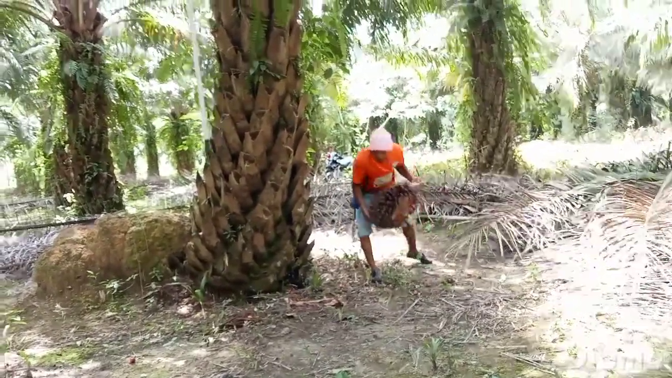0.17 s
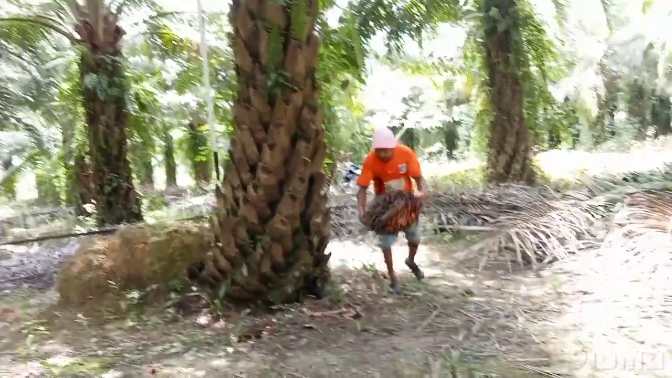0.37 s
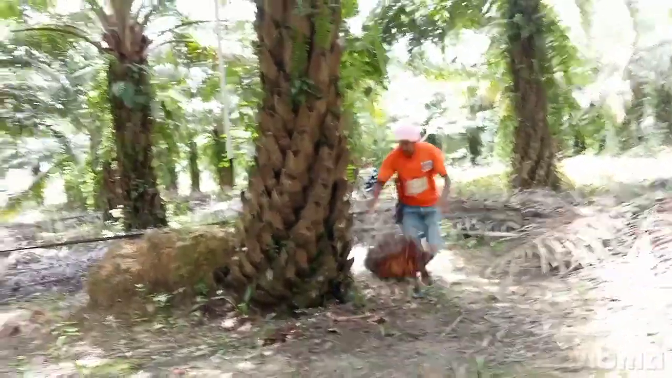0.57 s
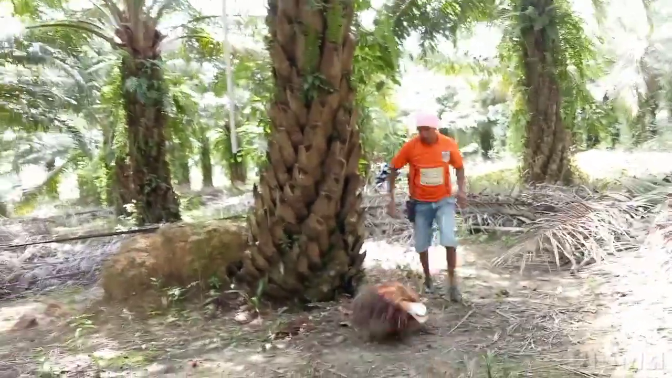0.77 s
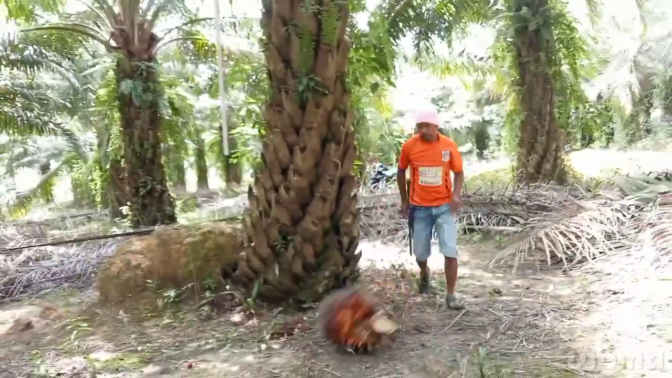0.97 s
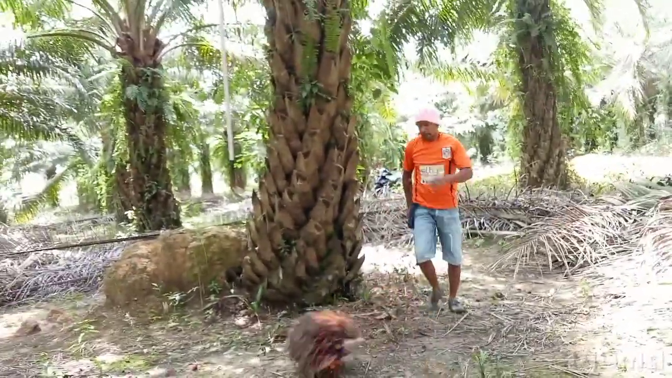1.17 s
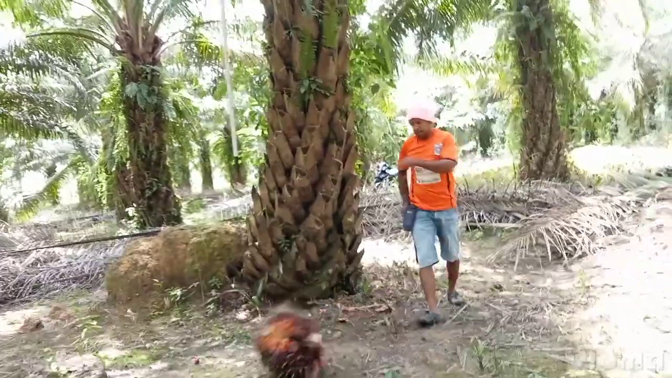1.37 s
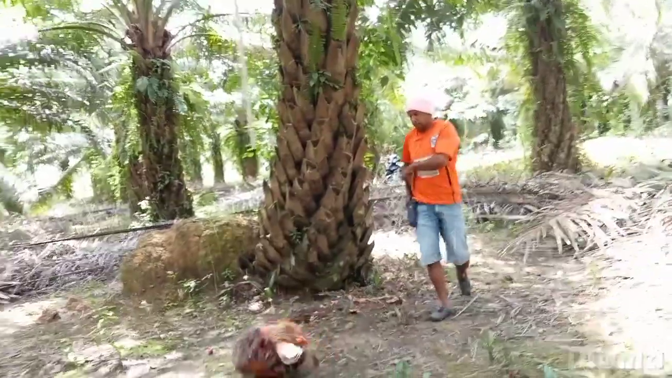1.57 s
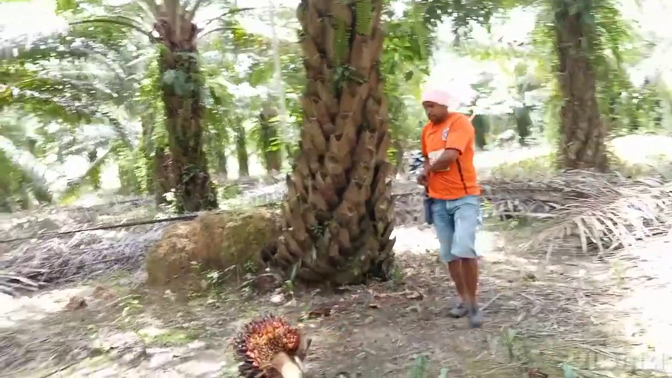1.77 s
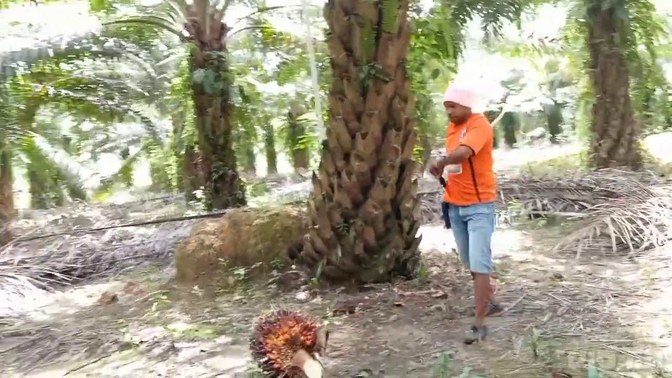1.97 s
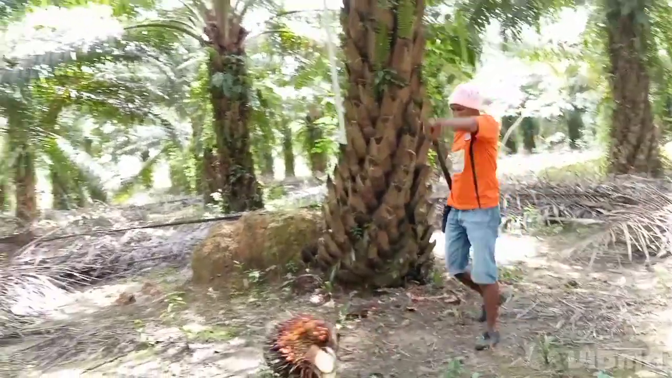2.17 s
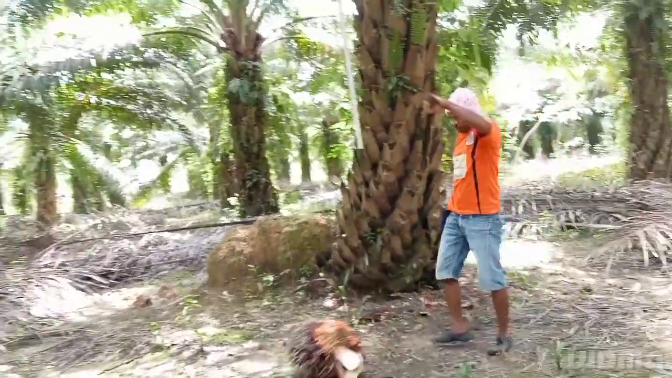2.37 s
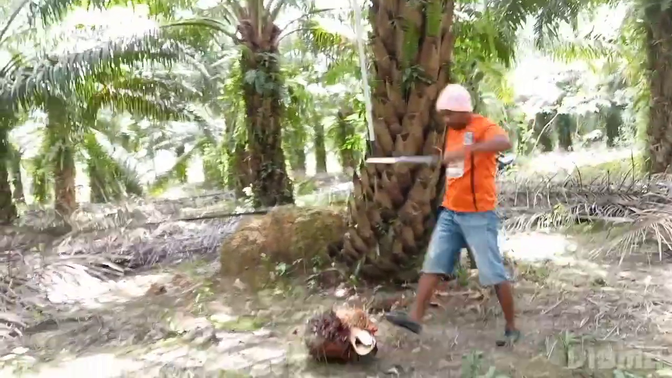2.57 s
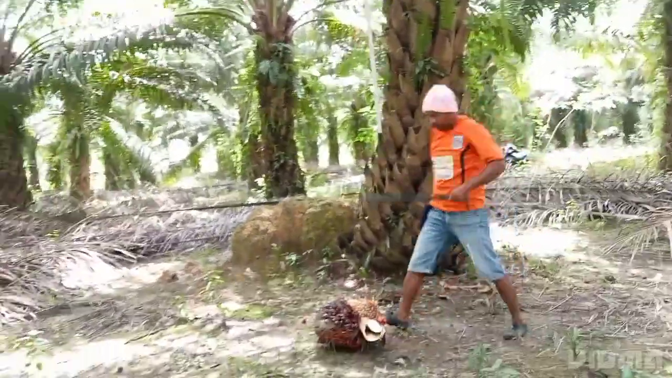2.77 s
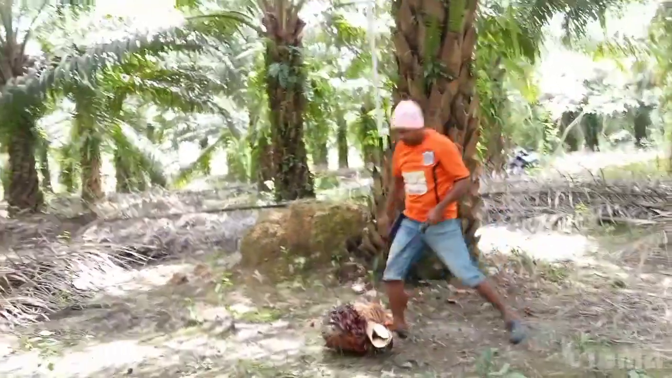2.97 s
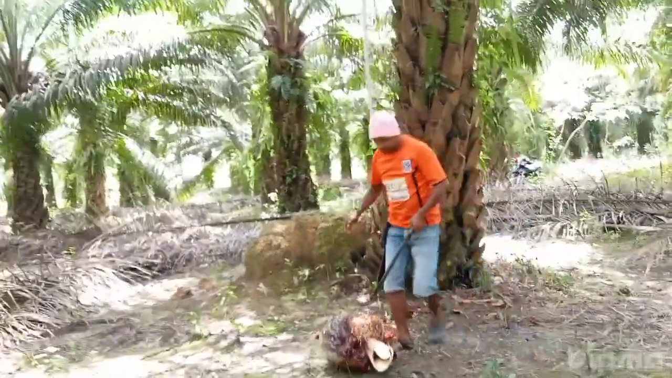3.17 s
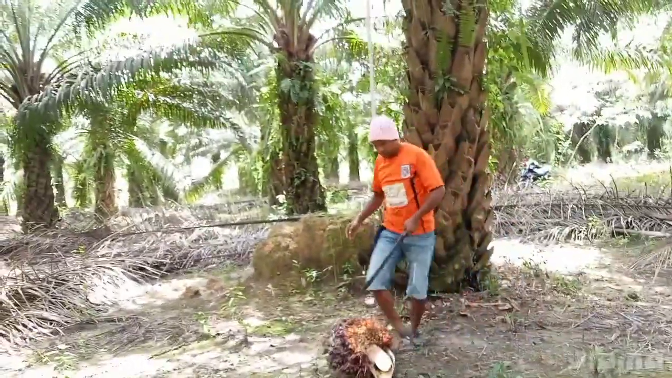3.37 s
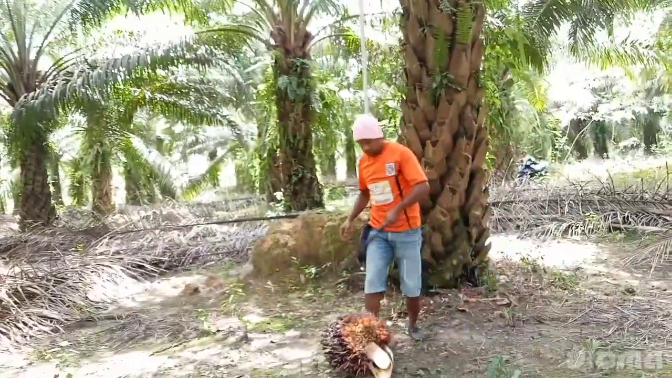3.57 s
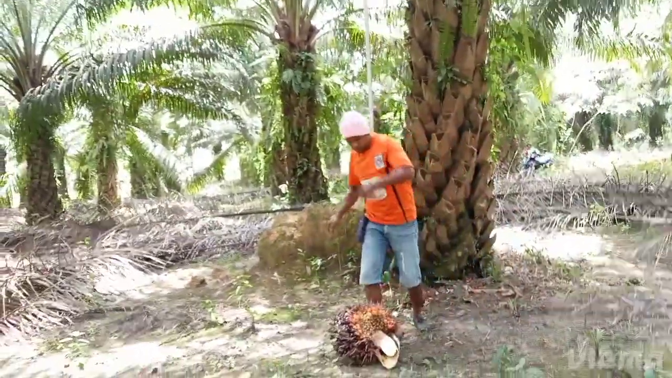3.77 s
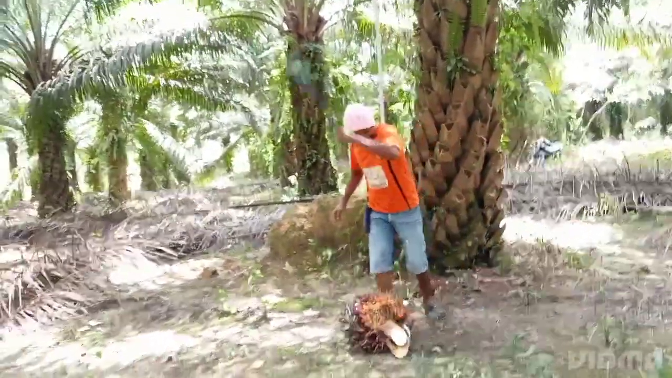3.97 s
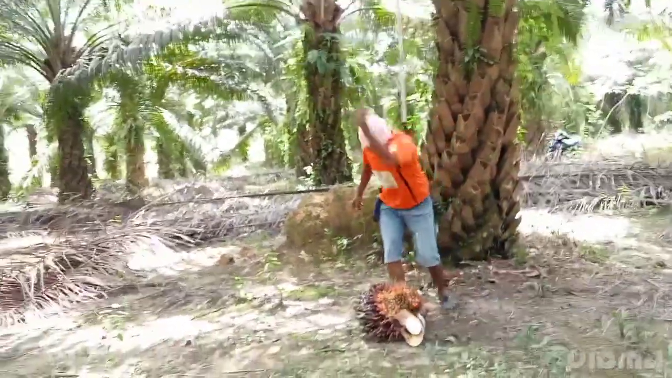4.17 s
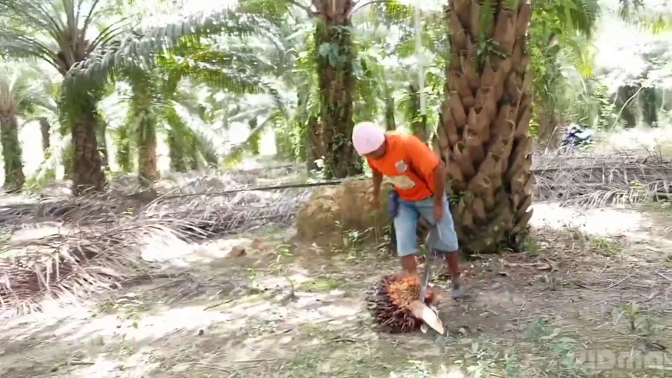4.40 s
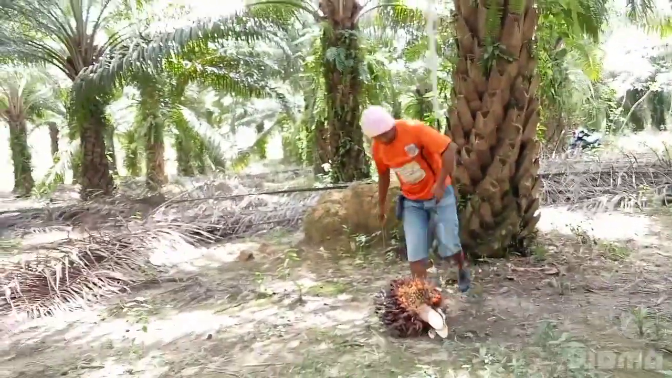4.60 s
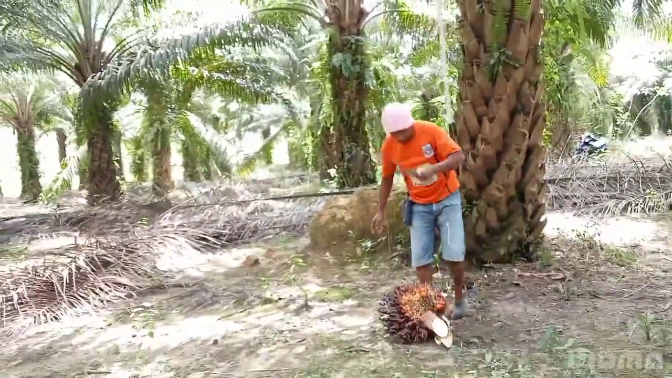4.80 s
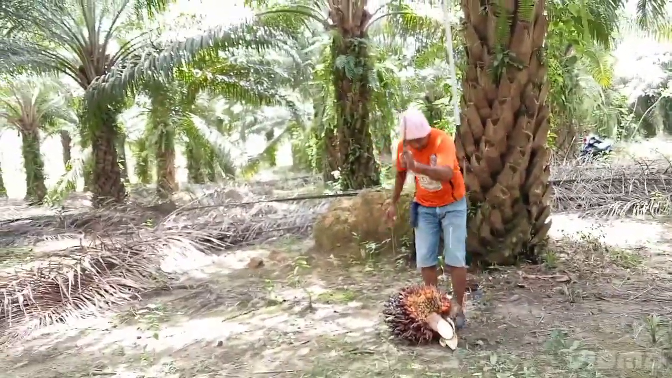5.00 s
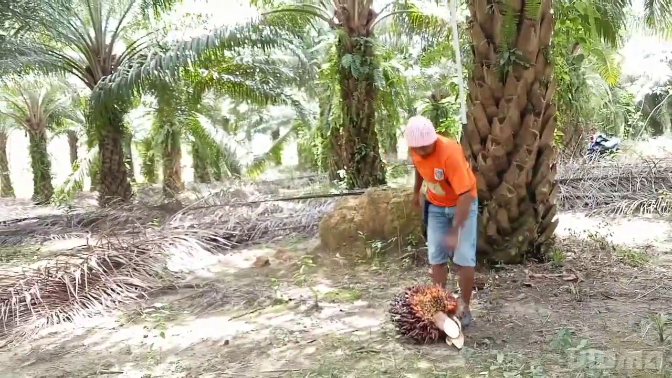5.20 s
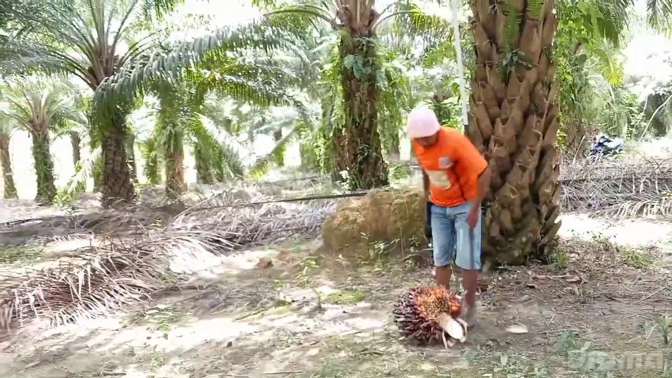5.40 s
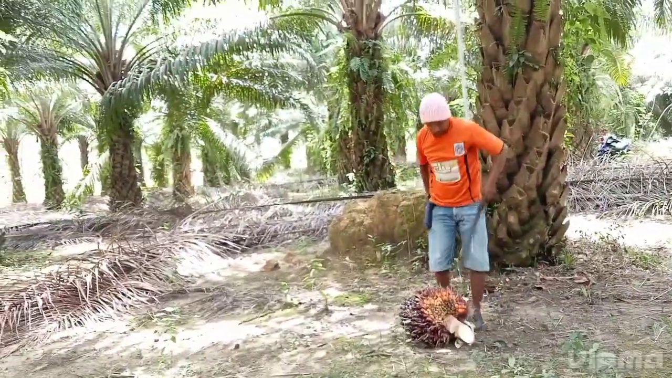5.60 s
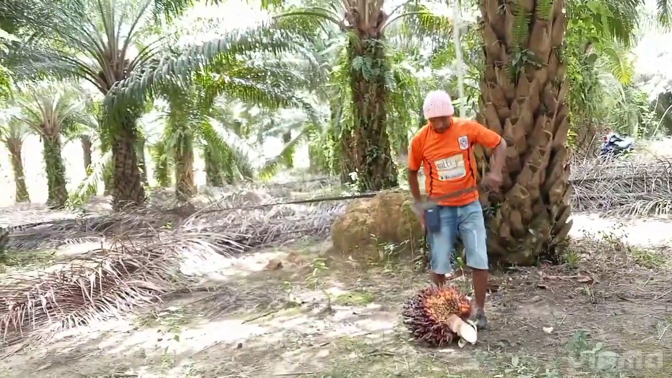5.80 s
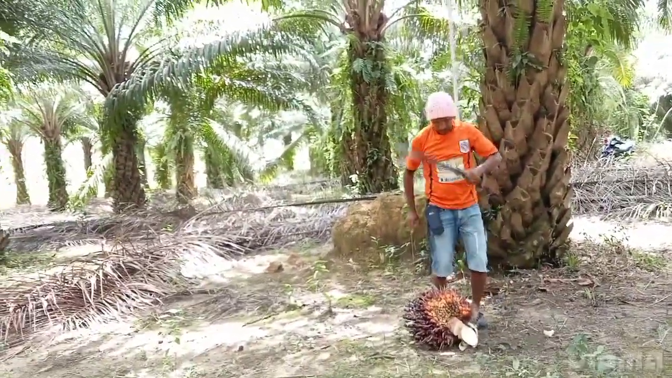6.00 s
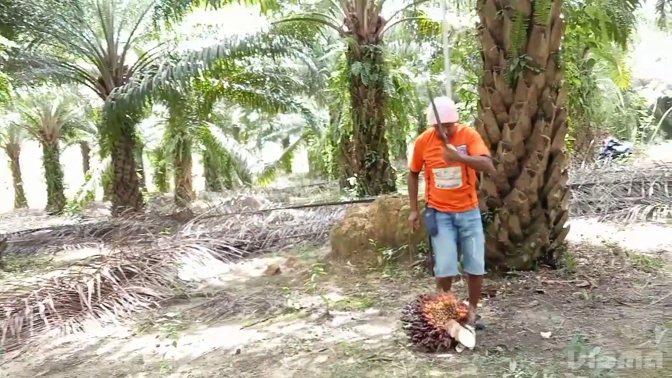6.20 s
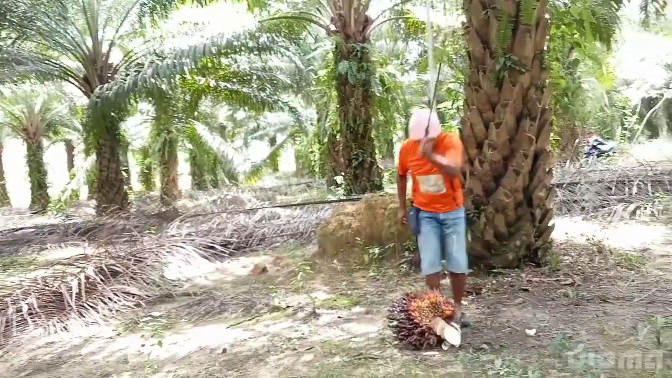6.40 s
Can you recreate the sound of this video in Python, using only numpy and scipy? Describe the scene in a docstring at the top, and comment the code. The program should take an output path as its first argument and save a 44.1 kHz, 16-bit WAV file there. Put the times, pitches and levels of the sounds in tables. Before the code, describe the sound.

Outdoors under a steady high insect buzz: a weighty thud on dry litter, shuffling steps, sharp clicks, then two hard blade chops ringing away.

```python
"""Cicadas drone all round, as a dense noise band with two throbbing voices, and an engine putters far off.
This is an oil palm plantation: a harvester shuffles through dry litter (clumped grains) and his tool clicks
(noise bursts). A dropped bunch thuds and rolls (crushed grains, ground modes); birds whistle (narrow noise).
Two chops into a stalk tear fibres and ring modes; the trunks scatter the work back as a bright tail, and
after the second chop the blade's ring echoes as a faint narrow tone."""
import sys
import numpy as np
from scipy import signal
from scipy.fft import rfft, irfft
from scipy.io import wavfile

SR = 44100
rng = np.random.default_rng(int(sys.argv[2]) if len(sys.argv) > 2 else 0)


def store_wav(level_fs):
    """Save 16-bit WAV to argv[1]."""
    pcm = np.round(np.clip(np.atleast_2d(level_fs), -1, 1) * 32767)
    wavfile.write(sys.argv[1], SR, pcm.T.astype(np.int16))


N = 284427
TIME = np.arange(N) / SR  # s
CUTOFF_HZ = 15550

# Spectrum of the scatter from the trunks. Each row: frequency in Hz, level in dB against the direct sound.
TRUNK_SCATTER = [(100, -11), (300, -15.5), (600, -20.5), (1200, -5), (2100, 1.5), (3000, 1), (3700, -14.5),
                 (5200, -2.5), (8000, -6), (15000, -14)]


def from_db(db):
    """Amplitude ratio: 20 dB is a factor of ten in gain."""
    return 10 ** (np.asarray(db) / 20)


def rms_one(x):
    """Normalization by mean square: the result has rms 1."""
    return x / np.sqrt(np.mean(x ** 2) + 1e-20)


def in_time(rows):
    """Linear interpolation in time: each column of a curve at every sample."""
    s, *columns = np.transpose(rows)
    return [np.interp(TIME, s, column) for column in columns]


def at_hz(points, hz):
    """Interpolation on a logarithmic frequency axis."""
    known_hz, values = np.transpose(points)
    return np.interp(np.log(hz + 1), np.log(known_hz), values)


def colour(x, spectrum, size=8192):
    """Minimum-phase filtering by a folded cepstrum: causal, and white noise keeps its power."""
    gain = rms_one(from_db(at_hz(spectrum, np.fft.rfftfreq(size, 1 / SR))))
    cepstrum = irfft(np.log(gain))
    fold = np.r_[1, np.full(size // 2 - 1, 2), 1, np.zeros(size // 2 - 1)]
    impulse_response = irfft(np.exp(rfft(cepstrum * fold)))
    return signal.oaconvolve(x, impulse_response)[:len(x)]


def drift(knots_per_s):
    """Slow random modulation: Gaussian knots joined by straight lines, with a spread near 1."""
    knots = rng.standard_normal(N // 50)
    return np.interp(TIME * knots_per_s, np.arange(len(knots)), knots)


def resonate(x, hz, width_hz):
    """Two-pole resonance: damping sets the bandwidth, and the gain at the peak is 1."""
    r = np.exp(-np.pi * width_hz / SR)
    numerator = np.array([1, 0, -1]) * (1 - r * r) / 2
    denominator = [1, -2 * r * np.cos(2 * np.pi * hz / SR), r * r]
    return signal.lfilter(numerator, denominator, x + 1e-18)


def ring(modes, rise_s):
    """Modal superposition: damped sines, set going by a contact that builds over rise_s."""
    t = TIME[:SR // 2]
    vibration = sum(from_db(db - 60 * t / t60) * np.sin(2 * np.pi * hz * t) for hz, db, t60 in modes)
    return vibration * (1 - np.exp(-t / rise_s))


def grains(per_s, spread_db):
    """Shot noise: randomly timed clicks of uneven size and either sign, with rms 1."""
    sizes = from_db(spread_db * np.minimum(rng.exponential(1, N), 4)) * rng.choice([-1, 1], N)
    return rms_one(sizes * (rng.random(N) < per_s / SR))


def pulses(per_s, start):
    """Cyclic excitation: one click each time the accumulated phase completes a turn."""
    turns = start + np.cumsum(per_s) / SR
    return np.diff(np.floor(turns), prepend=np.floor(start))


def crack(envelope):
    """Broadband transient: a noise burst whitened by setting its spectral magnitudes equal."""
    burst = envelope * rng.standard_normal(len(envelope))
    # the envelope disturbs the flat spectrum, so the two are imposed in turn
    for _ in range(4):
        flat = irfft(np.exp(1j * np.angle(rfft(burst))), len(envelope))
        burst = envelope * flat
    return rms_one(burst) * np.sqrt(np.mean(envelope ** 2))


def add(track, s, sound):
    """Linear superposition of a sound on a track at time s."""
    at = round(s * SR)
    track[at:at + len(sound)] += sound[:N - at]


def cicadas(far_db=0.73, throb=0.98, smear_s=0.0022, width_hz=120, flutter_db=0.93):
    """Incoherent sum: countless far insects blur into a band; near tymbals excite throbbing resonances."""
    # Level of the whole chorus. Each row: time in seconds, level in dB.
    chorus_level = [(0, -47.5), (.7, -47.5), (1.6, -49.5), (2.3, -47.5), (3.2, -47), (4.3, -46.5),
                    (5.1, -46), (5.8, -46), (6.45, -45.5)]
    # Spectrum of the far insects. Each row: frequency in Hz, relative density in dB per Hz.
    chorus_band = [(5600, -41.5), (6050, -26), (6350, -14.5), (6800, -5.5), (7050, 3), (7450, 4),
                   (7900, -0.5), (8200, -18.5), (9300, -44), (11700, -51), (13000, -26.5), (13800, -26),
                   (14900, -11), (15600, -25)]
    # Nearer insects. Each row: pitch in Hz, mean tymbal clicks per second, mean throbs per second,
    # mean level in dB against the chorus.
    near_insects = [(7114, 61, 29, -10), (7196, 160, 17, -7.5)]
    far = colour(rng.standard_normal(N), chorus_band)
    out = from_db(far_db + flutter_db * drift(25)) * far
    for hz, clicks_per_s, throbs_per_s, db in near_insects:
        pace = 1 + .025 * drift(1.6)
        buzz = signal.lfilter([1], [1, -np.exp(-1 / (smear_s * SR))], pulses(clicks_per_s * pace, 0))
        swell = 1 + throb * np.sin(2 * np.pi * np.cumsum(throbs_per_s * pace) / SR)
        excitation = buzz * swell * rng.standard_normal(N)
        song = resonate(resonate(excitation, hz, width_hz), hz, width_hz=440)
        out += from_db(db + 0.68 * drift(4.1)) * rms_one(song)
    return from_db(in_time(chorus_level)[0]) * out


def engine(start=0.1998, smear_s_per_hz=.00009, boom_hz=96, boom_octaves=0.27):
    """Harmonic series of the firing rate, smeared by distance; as it labours, low orders swell to a boom."""
    # Running of the engine. Each row: time in seconds, firings per second, putter level in dB, boom level in dB.
    running = [(0, 15.8, -56.5, -87), (5.55, 15.45, -59.5, -78), (5.66, 13.2, -53, -68),
               (5.82, 11.8, -55, -57), (6.0, 13, -65, -56.5), (6.2, 15.5, -68, -58.5),
               (6.45, 11.8, -62, -53)]
    # Exhaust note. Each row: order as a multiple of the firing rate, relative level in dB.
    exhaust = [(1, -35), (2, -28), (3, -24), (4, -25), (5, 3.5), (6, -1.5), (7, -0.5), (8, -29), (9, -35),
               (10, -7), (11, 2), (12, -3), (13, -21), (14, -11.5), (15, -10.5), (16, -23.5), (17, -20.5),
               (18, -8.5), (19, -9), (20, -12), (21, -37), (22, -14.5), (23, -20.5), (24, -30)]
    per_s, putter_db, boom_db = in_time(running)
    waver, scatter_rad = .12, .45
    angle = 2 * np.pi * (start + np.cumsum(per_s) / SR)
    putter, boom = 0, 0
    for order, order_db in exhaust:
        hz = order * per_s
        # higher orders arrive a little later, each by its own path
        phase = order * angle - np.pi * smear_s_per_hz * hz ** 2 + rng.normal(0, scatter_rad)
        strength = from_db(order_db) * (1 + waver * drift(16))
        putter = putter + strength * np.cos(phase + waver * drift(3.3))
        # only the orders near the boom pitch swell
        weight = 1 / (1 + (np.log2(hz / boom_hz) / boom_octaves) ** 4)
        boom = boom + weight * from_db(2 * drift(2.46)) * np.cos(phase + rng.uniform(0, 2 * np.pi))
    return from_db(putter_db) * rms_one(putter) + from_db(boom_db) * rms_one(boom)


def hum_and_hiss(level_db=-58):
    """Stationary noise: far hum and leaf hiss share one shaped spectrum."""
    # Each row: frequency in Hz, relative density in dB per Hz.
    air_spectrum = [(20, -23), (45, 1), (75, 7.5), (150, 10.5), (300, -4), (500, -5.5), (1100, -10),
                    (2200, -8), (3300, -4), (4100, -17), (5200, -35), (8500, -12.5), (12000, -31)]
    return from_db(level_db) * colour(rng.standard_normal(N), air_spectrum)


def litter(scrape_db=-1, crackle_db=-2, clump_db=3.5, clumps_per_s=110):
    """Granular friction: soil scrapes in clumps of grains under each scuff; dry leaves crackle more sparsely."""
    # Scuffs of feet and of the rolling bunch. Each row: time of hardest push in seconds, build time in seconds,
    # fade time in seconds, soil scrape in dB and leaf crackle in dB before the overall trims.
    scuffs = [(0.04, 0.38, 0.17, -55.5, -52.5), (0.225, .02, 0.17, -67, -56.5),
              (0.583, 0.0083, 0.03, -63, -43), (0.65, 0.087, 0.028, -51.5, -58),
              (0.874, 0.025, 0.065, -36, -41.5), (1.038, 0.088, 0.075, -52, -48.5),
              (1.245, 0.072, 0.12, -51.5, -56), (1.53, 0.29, 0.15, -50.5, -52),
              (1.88, 0.33, 0.12, -56, -55.5), (2.029, 0.065, 0.11, -49.5, -76),
              (2.23, 0.11, 0.099, -61, -58), (2.39, 0.26, 0.12, -42, -55), (3.06, 0.12, 0.13, -58, -65),
              (3.40, 0.13, 0.66, -56.5, -58)]
    # Spectra of soil and of dry leaves. Each row: frequency in Hz, relative density in dB per Hz.
    soil_spectrum = [(200, -14), (420, -16), (650, 4), (1000, -1), (1400, 3), (2400, 3), (3400, 9.5),
                     (4200, -10.5), (5200, -36), (7000, -17)]
    leaf_spectrum = [(2000, -15), (3500, 25), (5200, 0), (7500, 28.5), (9500, 14.5), (12000, 10),
                     (14500, -37)]
    range_db = 20  # rise in one build time, fall in one fade time
    scrape, crackle = 0, 0
    for s, build_s, fade_s, soil_db, leaf_db in scuffs:
        push_db = -range_db * np.maximum((s - TIME) / build_s, (TIME - s) / fade_s)
        scrape = scrape + from_db(soil_db + push_db)
        crackle = crackle + from_db(leaf_db + push_db)
    clumps = from_db(clump_db * drift(clumps_per_s))
    soil = from_db(scrape_db) * scrape * clumps * grains(per_s=1400, spread_db=1.0)
    leaves = from_db(crackle_db) * crackle * clumps * grains(per_s=840, spread_db=-1.0)
    return colour(soil, soil_spectrum) + colour(leaves, leaf_spectrum)


def clicks(crack_db=1, crack_s=0.002, octaves=0.28):
    """Impulsive excitation: cracks a few ms long, each strongest in a broad band round its own pitch."""
    # Tool clicks and snapping twigs. Each row: start in seconds, level in dB before the overall trim, pitch in Hz.
    snaps = [(0.043, -42, 2370), (0.222, -34.5, 3200), (.254, -44, 3130), (0.584, -35, 3400),
             (1.2931, -25, 2360), (1.86, -40, 3250), (2.222, -27, 1490), (2.878, -41.5, 3900),
             (2.902, -40, 3970), (3.4488, -22.5, 3070), (3.459, -25, 1870), (3.5031, -25.5, 3070),
             (3.514, -29.5, 2300), (3.6775, -17, 2650), (3.694, -19.5, 2170), (3.736, -37, 3420),
             (3.803, -37.5, 2920), (4.0792, -29.5, 2120), (4.092, -35.5, 2780), (4.2116, -23, 1370),
             (4.447, -21.5, 2700)]
    # Common colour. Each row: frequency in Hz, relative level in dB.
    snap_spectrum = [(200, -18), (800, 4), (1500, 1), (3700, 6.5), (5000, -12), (8000, 4), (11000, -6.5),
                     (15000, -37)]
    out, t = np.zeros(N), TIME[:SR // 20]
    rise_s = .0002
    envelope = (1 - np.exp(-t / rise_s)) * np.exp(-t / crack_s)
    for s, db, hz in snaps:
        edges_hz = [hz / 2 ** octaves, min(hz * 2 ** octaves, CUTOFF_HZ)]
        band = signal.butter(1, edges_hz, "band", fs=SR, output="sos")
        add(out, s, from_db(db + crack_db) * signal.sosfilt(band, crack(envelope)))
    return colour(out, snap_spectrum)


def bumps(rise_s=0.00052):
    """Inelastic impact: soft contacts crush husk and soil; the bunch's full weight also excites ground modes."""
    # The bunch lands and rolls, feet come down. Each row: start in seconds, level in dB, t60 in seconds.
    contacts = [(0.868, -29, 0.1), (1.025, -45, 0.15), (1.236, -36, 0.075), (1.293, -45.5, 0.14),
                (1.354, -42.5, 0.052), (1.528, -51.5, 0.34), (1.725, -48.5, 0.11), (2.02, -48.5, 0.098),
                (2.348, -52, 0.41), (3.028, -51, 0.095), (3.383, -50, 0.097), (3.468, -44.5, 0.08),
                (3.711, -52, 0.06), (4.626, -43, 0.051), (5.045, -53, 0.16)]
    # Crushed husk and soil. Each row: frequency in Hz, relative density in dB per Hz.
    husk_spectrum = [(60, -37), (170, -5), (300, -2.5), (420, -8), (620, 8), (950, -6.5), (1350, -1.5),
                     (2200, -42), (3400, -3), (5000, -53), (8000, -25), (15000, -22)]
    # Full weight reaching the ground. One row: start in seconds, level in dB.
    landing = (.8735, -28.5)
    # Modes of the ground. Each row: frequency in Hz, relative level in dB, t60 in seconds.
    ground_modes = [(60.7, 1, 0.19), (89, 2.5, 0.14), (128, 4.5, 0.089), (177, 5, 0.09), (263, -2.2, 0.1)]
    pressure, ground = np.zeros(N), np.zeros(N)
    t = TIME[:SR // 2]
    for s, db, t60 in contacts:
        add(pressure, s, from_db(db - 60 * t / t60) * (1 - np.exp(-t / rise_s)))
    landing_s, landing_db = landing
    add(ground, landing_s, from_db(landing_db) * ring(ground_modes, rise_s=0.0015))
    crushing = pressure * grains(per_s=17000, spread_db=2.0)
    return colour(crushing, husk_spectrum) + ground


def faint_tones(blur_hz=130):
    """Narrow-band noise: resonances blur the pitch of far bird whistles and of one echo of the blade."""
    # Faint narrow tones: far bird whistles, and at 5.535 s the 3.4 kHz ring of the blade echoing after the
    # second chop. Each row: start in seconds, length in seconds, pitch in Hz, level in dB.
    tone_rows = [(3.02, 0.15, 3420, -63), (3.792, 0.14, 3290, -58), (5.019, .09, 3280, -59.5),
                 (5.535, 0.22, 3400, -54), (5.94, 0.063, 3100, -59.5)]
    out = np.zeros(N)
    for s, length_s, hz, db in tone_rows:
        shape = np.hanning(round(length_s * SR))
        steady = resonate(resonate(rng.standard_normal(SR), hz, blur_hz), hz, blur_hz)
        tone = steady[-len(shape):]  # the resonance has settled by then
        add(out, s, from_db(db) * shape * rms_one(tone))
    return out


def chops(sink_s=0.00295, release_s=0.0016, bite_s=0.00018):
    """Fracture and modal ringing: the blade rings on contact, tears fibres for a few ms, stops with a thump."""
    # Blows. Each row: start in seconds, tearing level in dB, tearing length in seconds, stalk level in dB,
    # blade level in dB, thump pitch in Hz, thump level in dB.
    blow_rows = [(4.5069, -11, 0.01, -17.5, 0.5, 532, -12), (5.4268, -13, 0.00675, -20, 2, 622, -2)]
    # Modes of stalk and blade. Each row: frequency in Hz, relative level in dB, t60 in seconds.
    stalk_modes = [(140, -4, 0.073), (291.4, -3, 0.15), (467, 4, 0.074), (830, -29, 0.12)]
    blade_modes = [(2394, -10, 0.011), (3400, 0, 0.016), (3530, -15, 0.017)]
    # The blade stopping in the stalk. Each row: ratio to the thump pitch, relative level in dB, t60 in seconds.
    thump_modes = [(1, 0, 0.039), (1.26, 2, 0.022)]
    # Tearing fibres. Each row: frequency in Hz, relative density in dB per Hz.
    fibre_spectrum = [(110, -11.5), (290, 2), (390, -10), (540, 11.5), (950, -3), (1350, 2), (2000, -3),
                      (3200, 7), (4200, -7), (5200, -25), (7600, 3), (9500, -5), (12000, -7), (15000, -1.5)]
    tear, body = np.zeros(N), np.zeros(N)
    t = TIME[:SR // 10]
    for s, tear_db, length_s, stalk_db, blade_db, thump_hz, thump_db in blow_rows:
        cutting = (1 - np.exp(-t / bite_s)) * np.exp(-np.maximum(t - length_s, 0) / release_s)
        thump = [(ratio * thump_hz, db + thump_db, t60) for ratio, db, t60 in thump_modes]
        add(tear, s, from_db(tear_db) * crack(cutting))
        add(body, s, from_db(blade_db) * ring(blade_modes, rise_s=0.0025))
        stalk = from_db(stalk_db) * ring(stalk_modes, rise_s=0.0033)
        add(body, s + sink_s, stalk + ring(thump, rise_s=0.0019))
    return colour(tear, fibre_spectrum) + body


def trunks(x, db=-13, echoes_per_s=2500, first_s=0.0074, t60=0.49):
    """Discrete reflection: the nearest trunks return separate echoes, which give the tail its grain."""
    t = TIME[:SR // 2]
    decay = (t > first_s) * from_db(-60 * t / t60)
    taps = grains(echoes_per_s, spread_db=6.5)[:len(t)] * decay
    response = rms_one(colour(taps, TRUNK_SCATTER)) / np.sqrt(len(t))
    return from_db(db) * signal.oaconvolve(x, response)[:N]


def grove(x, build_s=0.011, spread_s=0.034, count=16):
    """Diffuse scattering: the echo energy in each band builds up, thins out with distance and dies."""
    # Decay of the scatter. Each row: frequency in Hz, t60 in seconds.
    scatter_t60 = [(150, 0.75), (700, 0.3), (1500, 0.25), (3000, 0.94), (5500, 0.81), (9000, 0.54),
                   (15000, 0.3)]
    t, edges_hz = TIME[:SR], np.geomspace(150, 16000, count + 1)
    white, out = rng.standard_normal((2, N)), 0
    for k, band in enumerate(zip(edges_hz, edges_hz[1:])):
        sos = signal.butter(3, band, "band", fs=SR, output="sos")
        hz = np.sqrt(np.prod(band))
        decay = from_db(-60 * t / at_hz(scatter_t60, hz))
        tail = (1 - np.exp(-(t / build_s) ** 2)) / np.hypot(1, t / spread_s) * decay
        source_energy = signal.sosfilt(sos, x + 1e-9 * white[0]) ** 2
        energy = signal.oaconvolve(source_energy, tail ** 2 / np.sum(tail ** 2))[:N]
        carrier = rms_one(signal.sosfilt(sos, white[k % 2]))
        out = out + from_db(at_hz(TRUNK_SCATTER, hz)) * np.sqrt(np.abs(energy)) * carrier
    return out


def scene(step_echo_db=-5, click_echo_db=-11, diffuse_db=0.5):
    """Superposition of the work close by, its echoes, and the plantation behind."""
    background = cicadas() + engine() + hum_and_hiss()
    steps, ticks, tones, blows = litter() + bumps(), clicks(), faint_tones(), chops()
    outward = blows + from_db(step_echo_db) * steps + from_db(click_echo_db) * ticks
    echoes = trunks(outward) + from_db(diffuse_db) * grove(outward)
    return (background + steps + ticks + tones + blows + echoes)[None]


def record(dry, limit_db=-7, release_db_per_s=22, low_cut_hz=45):
    """Band limiting and compression: deep bass and top are cut, loud peaks duck the gain and are rounded."""
    x = signal.sosfilt(signal.butter(6, low_cut_hz, "high", fs=SR, output="sos"), dry[0])
    over_db = np.maximum(20 * np.log10(np.abs(x) + 1e-9) - limit_db, 0)
    # the reduction jumps to each peak, then recovers at a steady rate in dB
    recovery_db = release_db_per_s * TIME
    held_db = np.maximum.accumulate(over_db + recovery_db) - recovery_db
    attack_s, top = .005, .62
    r = np.exp(-1 / (attack_s * SR))
    reduction_db = signal.lfilter([1 - r], [1, -r], held_db)  # smoothed over the attack time
    x = top * np.tanh(x * from_db(-reduction_db) / top)
    return signal.sosfilt(signal.ellip(12, .1, 70, CUTOFF_HZ, fs=SR, output="sos"), x)[None]


dry = scene()
out = record(dry)
store_wav(out)
```